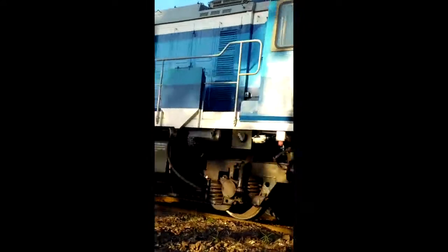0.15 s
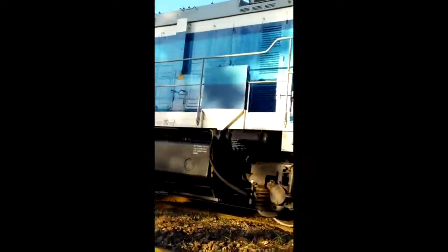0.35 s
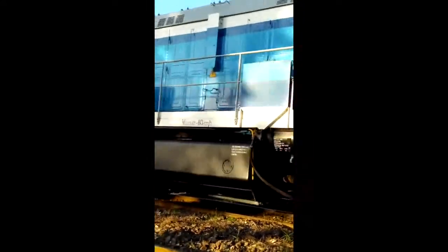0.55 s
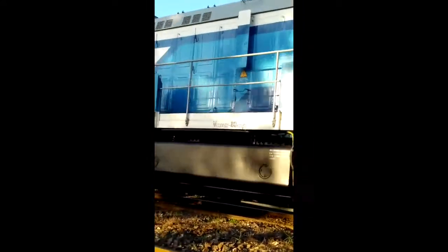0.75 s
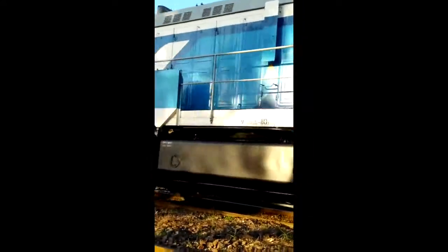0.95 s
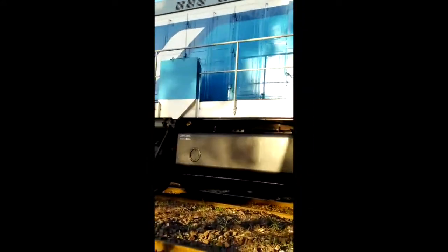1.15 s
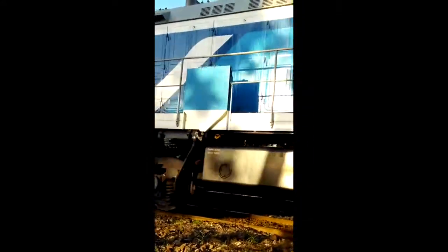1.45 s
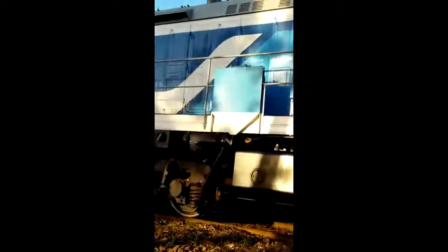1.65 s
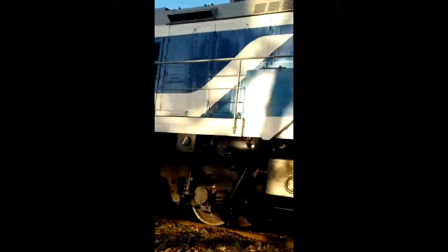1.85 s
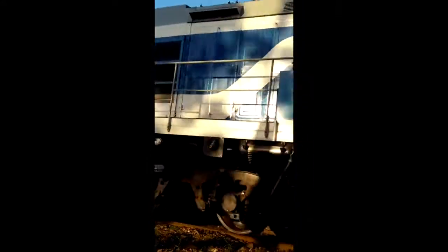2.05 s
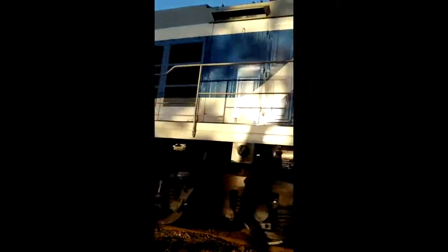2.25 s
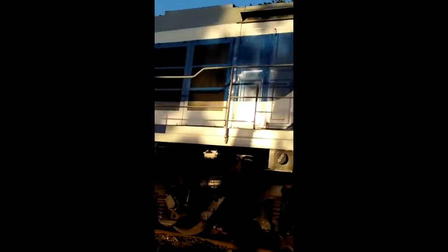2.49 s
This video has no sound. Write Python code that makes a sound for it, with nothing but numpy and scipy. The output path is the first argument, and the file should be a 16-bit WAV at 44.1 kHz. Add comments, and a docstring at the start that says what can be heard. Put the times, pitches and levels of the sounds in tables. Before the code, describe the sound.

A diesel locomotive rolls slowly past a phone outdoors, its rough low engine and fan roar throbbing throughout. Wheels clack at 0.2 seconds, with gritty scrapes and a tiny squeak around 0.35. A hard cluster of clacks comes at 0.8-1.1, another at 1.3. Wavering gear hum grows from 1.5, faint rims sing near 2.1, and a double clack lands at 2.54. Wind thumps low, mostly early.

```python
"""A diesel locomotive's engine and fans roar as it rolls slowly past a phone: shaped noise in narrow bands.
Gears hum as wavering tones, wheel rims sing as rubbed resonances, and one flange squeaks as a short tone.
Wheels clack at rail joints (click, noise, decaying tones); flanges scrape as short bursts of rough noise.
Wind thumps and rumbles at the two microphone ports, which the phone mixes into a wide stereo image."""
import sys
import numpy as np
from scipy import signal
from scipy.fft import rfft, irfft
from scipy.io import wavfile
from scipy.ndimage import uniform_filter1d

SR = 44100
rng = np.random.default_rng(int(sys.argv[2]) if len(sys.argv) > 2 else 0)


def persist_wave(psi):
    """Save psi, clipped to +-1, as 16-bit WAV."""
    counts = np.round(np.clip(psi, -1, 1) * 32767).astype(np.int16)
    wavfile.write(sys.argv[1], SR, np.atleast_2d(counts).T)


N = 115542  # length of the sound in samples


def undb(db):
    """Turn decibels into a plain multiplier."""
    return 10 ** (np.asarray(db) / 20)


def curve(table, column=1):
    """A table column joined by straight lines in time."""
    rows = np.array(table, float)
    return np.interp(np.arange(N) / SR, rows[:, 0], rows[:, column])


def unit(x):
    """Scale a sound to an average (rms) strength of 1."""
    return x / np.sqrt(np.mean(x ** 2))


def ring(x, hz, width_hz):
    """A resonance: lets one pitch through at full strength and weakens the rest."""
    b, a = signal.iirpeak(hz, hz / max(width_hz, 1), fs=SR)
    return signal.lfilter(b, a, x)


def band_noise(hz, width_hz):
    """A pair of noises narrowed twice by the same resonance."""
    return unit(ring(ring(pair(), hz, width_hz), hz, width_hz))


def pair():
    """Two independent noises: the mid (shared by both ears) and the side (their difference)."""
    return rng.standard_normal((2, N))


def walk(rate_hz):
    """Random wander of rms 1: noise averaged twice; a higher rate wanders faster."""
    k = max(int(SR / rate_hz), 2)
    smooth = uniform_filter1d(rng.standard_normal(N), k)
    return unit(uniform_filter1d(smooth, k))


def gate(start, length, attack, release):
    """Fade in, hold, then fade out after the given length (all in seconds)."""
    t = np.arange(N) / SR - start
    return np.clip(np.minimum(t / attack, (length - t) / release + 1), 0, 1)


# tone colour of the engine and fans: (frequency [Hz], relative level per hertz [dB])
ROAR_COLOUR = [(30, -12), (70, 0), (200, -4.5), (500, -8.5), (1000, -12), (1400, -12.5), (2000, -16.5),
               (2500, -28), (3500, -29), (4500, -39), (5100, -43.5), (5600, -51), (6300, -43.5),
               (7000, -39), (10000, -39), (15400, -41.5)]
# loudness as the body passes: (time [s], bass level [dB], middle level [dB],
# rolling noise level [dB], treble level [dB])
PASSING_LEVELS = [(0, -32, -25.5, -59, -72), (.16, -35, -40, -54.5, -45), (.27, -29, -35.5, -36.5, -42),
                  (.4, -30.5, -37.5, -39.5, -59), (.66, -27.5, -32, -44.5, -44), (.8, -28, -31, -45.5, -53),
                  (.84, -23, -28.5, -40, -46), (.93, -26.5, -37, -47, -52), (1.04, -37.5, -37.5, -52, -56),
                  (1.27, -34, -35.5, -54, -53), (1.6, -29.5, -32.5, -49.5, -48.5),
                  (1.95, -26, -26.5, -44.5, -50.5), (2.13, -25.5, -26.5, -50, -44.5),
                  (2.34, -28, -27.5, -47.5, -48.5), (2.62, -25, -26, -43.5, -49)]
# centres of those four zones: (frequency [Hz])
ZONES_HZ = [250, 1000, 3200, 8500]
# body panels ringing with the roar: (frequency [Hz], width [Hz], level against the middle zone [dB])
PANELS = [(230, 8, 1), (663, 16, -1), (1330, 12, -5), (1977, 30, -14), (2155, 20, -16)]
FIRING_HZ, FIRING_DEPTH, FIRING_JITTER = 29, 0.07, 0.045  # depth and jitter are shares
SWELL_DB, SWELL_HZ, CHURN_DB, CHURN_HZ = -0.5, 12.6, 0.7, 47.5  # shared by all bands
FLICKER_DB, FLICKER_HZ = 1.5, 29  # separate in each band


def roar():
    """Engine and fan noise follows the passing body, flickers band by band and throbs with the firings."""
    f = np.fft.rfftfreq(N, 1 / SR) + 1
    table = np.array(ROAR_COLOUR)
    colour = np.interp(np.log(f), np.log(table[:, 0]), table[:, 1])
    # take out the zones' own level and width, so that the passing levels set the loudness
    zone_db = np.interp(ZONES_HZ, f, colour) + 10 * np.log10([270, 250, 1000, 2000])
    colour -= np.interp(np.log(f), np.log(ZONES_HZ), zone_db)
    noise = rfft(pair()) * undb(colour) * np.sqrt(SR / 2)
    swell = SWELL_DB * walk(SWELL_HZ) + CHURN_DB * walk(CHURN_HZ)
    zones = np.array([curve(PASSING_LEVELS, column=k) for k in range(1, 5)])
    bands = 0
    for hz in 28 * 2 ** np.arange(0, 9.3, 1 / 3):  # a third of an octave apart
        # neighbouring bands overlap and add up to a whole
        share = np.cos(np.pi / 2 * np.clip(3 * np.log2(f / hz), -1, 1))
        place = np.interp(np.log(hz), np.log(ZONES_HZ), np.arange(4))
        low = min(int(place), 2)
        db = zones[low] + (place - low) * (zones[low + 1] - zones[low])
        level = 0.99 * undb(db + swell + FLICKER_DB * walk(FLICKER_HZ))
        bands = bands + irfft(noise * share ** 2, N) * level
    panels = sum(undb(db) * unit(ring(pair(), hz, width)) for hz, width, db in PANELS)
    panels = panels * undb(zones[1])
    firing_phase = 2 * np.pi * np.cumsum(FIRING_HZ * (1 + FIRING_JITTER * walk(6.3))) / SR
    return (bands + panels) * (1 + FIRING_DEPTH * np.cos(firing_phase))


# gear hum before its flutter: (time [s], level of partial 1 [dB], of partial 2 [dB], of partial 3 [dB])
HUM = [(0, -43, -32, -30), (.1, -30, -39.5, -46), (.3, -38.5, -31.5, -42), (.44, -22.5, -36, -35.5),
       (.54, -27.5, -34, -33), (.66, -18.5, -32.5, -34), (.75, -38, -38, -46), (1.08, -43, -38, -57),
       (1.18, -24.5, -31, -29.5), (1.42, -39.5, -42, -41.5), (1.53, -22, -32, -29), (1.62, -31, -34, -28.5),
       (1.7, -24, -26.5, -20.5), (1.82, -21.5, -37, -33.5), (1.92, -20.5, -38, -36),
       (1.98, -20.5, -23, -27), (2.08, -23, -31, -44), (2.13, -25, -22, -16.5), (2.2, -29, -41, -54),
       (2.25, -23, -22.5, -18.5), (2.33, -23, -23, -42), (2.5, -23.5, -27, -23), (2.62, -19, -32, -42)]
# a lower gear tone before its flutter: (time [s], level [dB])
LOWER_HUM = [(0, -42), (1.2, -38), (1.4, -29.5), (1.9, -28.5), (2.62, -34)]
# width of the hum as the bogies move past:
# (time [s], side against mid of partial 1 and the lower tone [dB], of partial 2 [dB])
HUM_SIDE = [(0, 14, -13), (.5, -67, -3), (.65, 5, 12), (.8, -5, 13), (1.2, -9, 6), (1.45, 0, 17), (2, 2, 2),
            (2.62, 14, 11)]
HUM_HZ, LOWER_HUM_HZ = 392.6, 337
HUM_WAVER, HUM_WAVER_HZ, HUM_FLUTTER_DB = .004, 18, 3  # waver is a share of the pitch


def gears():
    """Meshing teeth give three partials and a lower tone; the side lags the mid by a quarter cycle."""
    phase = 2 * np.pi * np.cumsum(HUM_HZ * (1 + HUM_WAVER * walk(HUM_WAVER_HZ))) / SR
    side_1, side_2 = undb(curve(HUM_SIDE, column=1)), undb(curve(HUM_SIDE, column=2))
    tones = [(phase, curve(HUM, column=1), side_1),
             (2 * phase, curve(HUM, column=2), side_2),
             (3 * phase, curve(HUM, column=3), 1),
             (phase * LOWER_HUM_HZ / HUM_HZ, curve(LOWER_HUM), side_1)]
    hum = 0
    for turn, db, side in tones:
        level = np.sqrt(2) * undb(db + HUM_FLUTTER_DB * walk(80))
        hum = hum + level * np.array([np.sin(turn), -side * np.cos(turn)])
    return hum


# pitches at which a wheel rim rings: (frequency [Hz], width [Hz], relative level [dB])
RIM = [(2720, 60, -6), (4824, 30, 1), (7249, 35, 1), (9822, 45, 2), (12360, 50, -4), (12527, 50, -4),
       (15073, 40, -6)]
# how hard the rims are rubbed, before RIM_DB is added: (time [s], level [dB])
RUB = [(0.0, -52.5), (0.44, -52), (0.9, -49.5), (0.92, -63), (1.18, -55), (2.0, -49), (2.06, -40),
       (2.22, -47), (2.62, -54.5)]
# one flange squeak: (start [s], length [s], frequency [Hz], peak level [dB])
SQUEAK = (.34, .056, 3893, -26.5)
RIM_DB, RIM_FLICKER_DB, RIM_FLICKER_HZ = 7, 2, 35


def rims():
    """Rubbing on the rail keeps the rim pitches singing, each one flickering; once a flange squeaks."""
    song = 0
    for hz, width, db in RIM:
        flicker = undb(db + RIM_FLICKER_DB * walk(RIM_FLICKER_HZ))
        song = song + flicker * unit(ring(pair(), hz, width))
    start, length, hz, db = SQUEAK
    squeak = gate(start, length, 0.0057, 0.0082) * np.sin(2 * np.pi * hz * np.arange(N) / SR)
    return song * undb(curve(RUB) + RIM_DB) + undb(db) * squeak


# wheel clacks: (time [s], overall level [dB], boost of ringing above 1000 Hz [dB],
# ring length [share of the rail's], click level [dB], pitch [share of the rail's])
CLACKS = [(0.221, -7, -4, 0.39, -8, 0.99), (0.826, -12.5, 5.5, 0.16, 1, 0.94),
          (0.8325, -1, -19, 0.48, -15, 1.1), (.8795, -11, -6, 0.12, -2, 0.57),
          (0.9235, -6, -12, 0.14, 3.5, 0.92), (0.9635, -10.5, -28, 0.43, 2.5, 1.1),
          (1.0375, -10.5, -18, 0.82, -3, .98), (1.0735, -14, -17, 1, 0, 1.02),
          (1.2892, -12.5, -16, 0.25, 0.5, 0.94), (2.5375, -6, -7, 0.9, -2, 0.98),
          (2.5447, -4.5, -12.5, 0.97, 2, 1.05)]
# ring of rail and wheel: (frequency [Hz], relative level [dB], time to fade by 60 dB [s])
RAIL = [(212, -14, 0.34), (486, 0, 0.081), (650, 1, 0.052), (1170, 12, 0.025), (1354, -4, 0.25),
        (1550, 5, 0.078), (2114, -3, 0.37), (2710, -9, 0.16), (3070, -19, 0.46), (3430, -9, 0.038)]
CRACK_S, CRACK_DB, CLACK_DB = 0.0035, -11.5, -4.5  # CLACK_DB scales both crack and ring
CLICK_S = .0007  # half a cycle of the click


def clacks():
    """At each joint a blunt click, a dull crack of noise and the fading ring of the rail."""
    out = np.zeros((2, N))
    t = np.arange(int(.3 * SR)) / SR
    dull = signal.butter(3, [350, 1800], "band", fs=SR, output="sos")
    click = -np.sin(np.pi * t / CLICK_S) * np.exp(-1.2 * (t / CLICK_S - 1.5) ** 2)
    for start, db, bright_db, ring_share, click_db, pitch in CLACKS:
        crack = unit(signal.sosfilt(dull, rng.standard_normal((2, len(t)))))
        crack = crack * np.exp(-t / CRACK_S) * undb(CRACK_DB)
        ringing = 0
        for hz, mode_db, t60 in RAIL:
            tone = np.sin(2 * np.pi * (hz * pitch * t + rng.random((2, 1))))
            fade = 1000. ** (-t / t60 / max(ring_share, .05))
            ringing = ringing + undb(mode_db + bright_db * (hz > 1000)) * tone * fade
        onset = np.minimum(t / 0.0026, 1)
        blow = undb(CLACK_DB) * (crack + ringing) * onset + undb(click_db) * click
        i = int(start * SR)
        out[:, i:i + len(t)] += (undb(db) * blow)[:, :N - i]
    return out


# flange scrapes before grit and streaks:
# (start [s], length [s], body level [dB], rasp level [dB], hiss level [dB])
SCRAPES = [(0, 0.033, -29.5, -67, -60), (0.211, 0.1, -24.5, -47, -41), (0.29, .03, -34, -41, -47),
           (0.325, 0.081, -26.5, -35.5, -40), (0.427, 0.035, -25, -35.5, -55), (.822, 0.074, -24, -41, -42),
           (2.01, 0.024, -44, -51, -53), (2.524, 0.067, -41, -43.5, -42.5)]
# body, rasp and hiss of a scrape, one row each: (frequency [Hz], width of each of two filters [Hz])
SCRAPE_BANDS = [(900, 1300), (3200, 4600), (9500, 10500)]
# thin metal streaks in the rasp: (frequency [Hz])
STREAKS_HZ = [1880, 2230, 2950, 3160, 3360, 3750, 4450]
SCRAPE_ATTACK_S, SCRAPE_RELEASE_S, SCRAPE_GRIT_DB, STREAK_DB = 0.01, 0.03, 3, 2.5


def scrapes():
    """Gritty friction comes in short bursts of noise; the rasp carries thin metal streaks."""
    bands = [band_noise(hz, width) * undb(SCRAPE_GRIT_DB * walk(83)) for hz, width in SCRAPE_BANDS]
    streaks = sum(ring(pair(), hz, 6.2) * undb(8.1 * walk(12)) for hz in STREAKS_HZ)
    bands[1] = bands[1] + undb(STREAK_DB) * unit(streaks)
    out = 0
    for start, length, *levels in SCRAPES:
        friction = sum(undb(db) * band for db, band in zip(levels, bands))
        out = out + gate(start, length, SCRAPE_ATTACK_S, SCRAPE_RELEASE_S) * friction
    return out


# wind puffs on the ports, before the final filter and mix:
# (time of peak [s], level [dB], pitch at the peak [Hz], nominal length [s], edge against thump [dB])
PUFFS = [(0.009, -17.5, 213, 0.011, -0.5), (0.08, -8, 181, 0.0064, -14), (0.202, -10, 142, 0.014, -44),
         (0.222, -9, 170, 0.022, -14.5), (0.319, -14.5, 201, 0.017, -23), (0.508, -11.5, 162, 0.029, -27),
         (0.582, -13, 139, 0.007, -11), (0.613, -15.5, 190, 0.023, -14), (0.685, -8.5, 138, 0.0083, -15.5),
         (0.703, -10, 140, 0.0066, -38), (0.812, -12, 260, 0.008, -29), (0.888, -5, 230, 0.016, -30),
         (0.91, -16.5, 128, 0.045, -7.5), (0.974, -6, 231, 0.013, -14), (1.027, -9.5, 155, 0.0078, -20),
         (1.29, -13.5, 258, 0.0091, -7.5), (2.316, -7.5, 197, 0.011, -16), (2.392, -13, 141, 0.01, -19),
         (2.516, -9, 154, 0.0088, -21.1)]
# rumble between the puffs, before flicker, filter and mix: (time [s], level [dB])
GUST = [(0, -42), (.04, -6.5), (.09, -27), (.2, -24), (.3, -21), (.45, -24), (.7, -22.5), (.8, -26),
        (.95, -15.5), (1.05, -17), (1.2, -25), (1.6, -31), (2.2, -45), (2.62, -24)]
PUFF_GLIDE, PUFF_ROUGH = -0.042, 0.47  # pitch change [share per length], phase wander [radians]
GUST_HZ, GUST_WIDTH_HZ, GUST_FLICKER_DB, GUST_EDGE_DB = 168, 157, 3.5, -14.5
EDGE_HZ, EDGE_WIDTH_HZ = 430, 500
WIND_CENTRE_DB = -13  # the low wind is weaker in the mid, so the ports mostly move oppositely


def wind():
    """Air pushes the ports in low sagging thumps with rough edges, over a ragged rumble."""
    t = np.arange(N) / SR
    thump, edge, rough = 0, 0, PUFF_ROUGH * walk(170)
    for at, db, hz, length, edge_db in PUFFS:
        since = t - at
        shape = np.exp(-.5 * (since / (0.29 * length)) ** 2) * undb(db)
        cycles = hz * since * (1 + PUFF_GLIDE * since / length / 2)
        wave = np.sin(2 * np.pi * (cycles + rng.random((2, 1))) + rough)
        thump = thump + np.sqrt(2) * shape * wave
        edge = edge + shape * undb(edge_db)
    gust = undb(curve(GUST) + GUST_FLICKER_DB * walk(73))
    low = thump + gust * band_noise(GUST_HZ, GUST_WIDTH_HZ)
    low = low * undb([[WIND_CENTRE_DB], [0]])
    edges = (edge + gust * undb(GUST_EDGE_DB)) * band_noise(EDGE_HZ, EDGE_WIDTH_HZ)
    keep_low = signal.butter(3, [85, 900], "band", fs=SR, output="sos")
    return signal.sosfilt(keep_low, low + edges)


# stereo mix of the ports: (frequency [Hz], side over mid [dB])
PORTS = [(70, 4), (130, -0.5), (400, -12.5), (700, -13.5), (1150, -38), (1450, -6), (1900, -2.5),
         (2450, 19), (2850, -0.5), (3700, -9.5), (4300, 2.5), (4800, 10), (5450, 20), (5750, 4.5),
         (6100, -7), (6900, 6), (7250, 6), (7700, 9.5), (8600, -8), (9200, 5), (9800, 2.5), (10600, 5),
         (12500, 0), (15400, 4)]
# part of the side made from the mid a quarter cycle apart, held within -1 and 1:
# (frequency [Hz], signed share)
LAG = [(200, 0), (350, -0.6), (600, -.4), (1600, -.3), (1950, -.5), (2900, .35), (3400, -0.2), (7300, -1.3),
       (7800, .6), (8500, .8), (8700, -.8), (9300, -.6), (9700, -0.28)]
# left weighed against right: (frequency [Hz], level [dB])
LEFT = [(100, -2.5), (450, -2.5), (1200, -1), (1900, -3.5), (2500, -1.5), (6300, -1.5), (7250, -5),
        (8500, -2), (9800, -10), (10500, -16), (12500, -11), (13400, -15), (14200, -11), (15400, -15)]


def ports(sound):
    """Two ports give each pitch its own stereo width: mid and side are mixed, then left is weighed."""
    f = np.fft.rfftfreq(N, 1 / SR)
    ratio = undb(np.interp(f, *np.array(PORTS).T))
    left = undb(np.interp(f, *np.array(LEFT).T))
    lag = np.clip(np.interp(f, *np.array(LAG).T), -1, 1)
    mid, side = rfft(sound) / np.sqrt(1 + ratio ** 2)
    side = ratio * (np.sqrt(1 - lag ** 2) * side + 1j * lag * mid)  # 1j turns by a quarter cycle
    return irfft([(mid + side) * left, mid - side], N)


def scene():
    """The locomotive passes through the stereo mix; the wind acts on the ports directly."""
    train = roar() + gears() + rims() + clacks() + scrapes()
    mid, side = wind()
    return ports(train) + [0.83 * (mid + side), mid - side]


TOP_HZ = 15450  # upper limit of the phone's sound


def record(dry):
    """The phone thins the deepest bass, rounds the very loudest peaks and cuts the top."""
    dry = signal.sosfilt(signal.butter(2, 50, "high", fs=SR, output="sos"), dry)
    rounded = dry / (1 + dry ** 6) ** (1 / 6)
    return signal.sosfilt(signal.ellip(14, .3, 90, TOP_HZ, fs=SR, output="sos"), rounded)


dry = scene()
out = record(dry)
persist_wave(out)
```